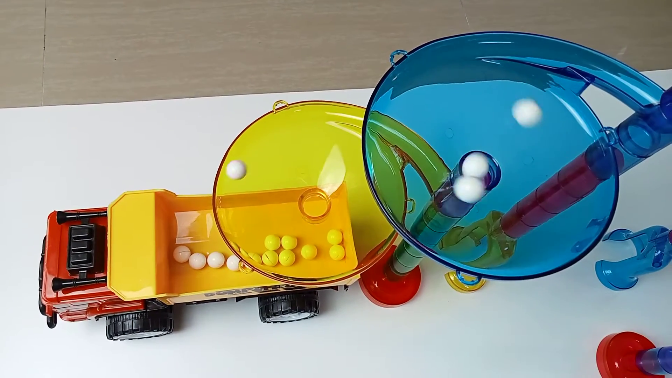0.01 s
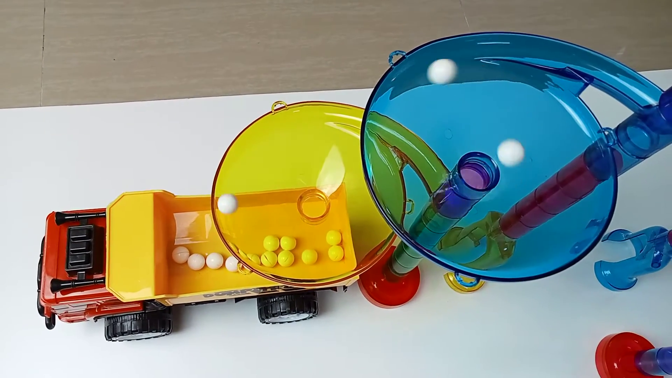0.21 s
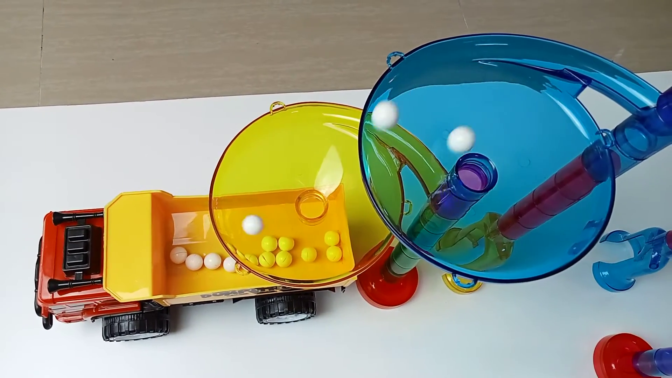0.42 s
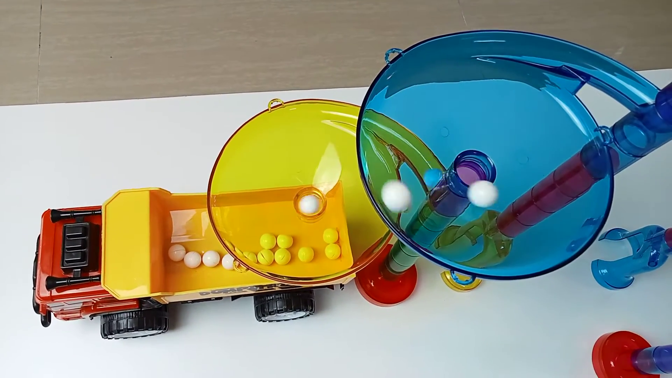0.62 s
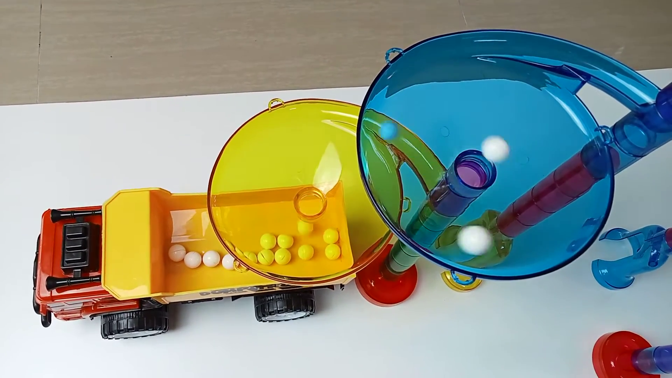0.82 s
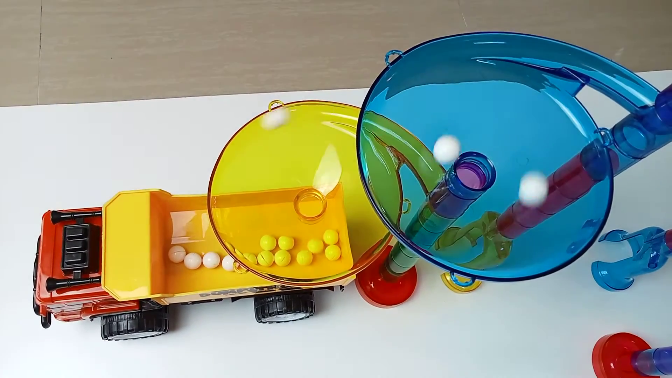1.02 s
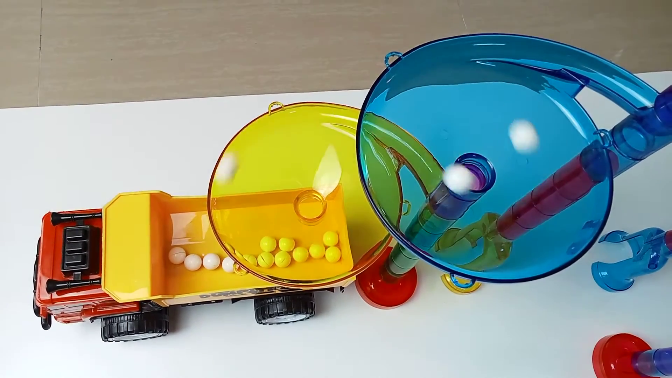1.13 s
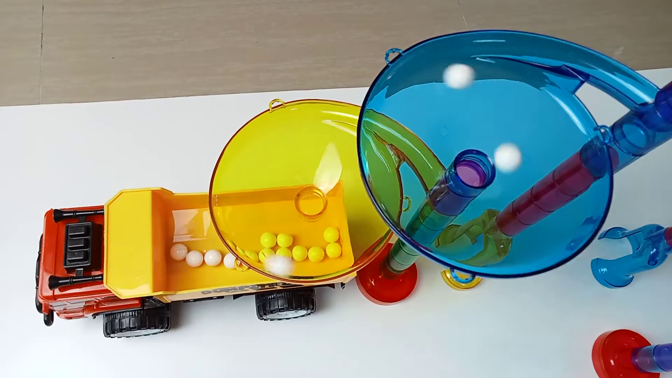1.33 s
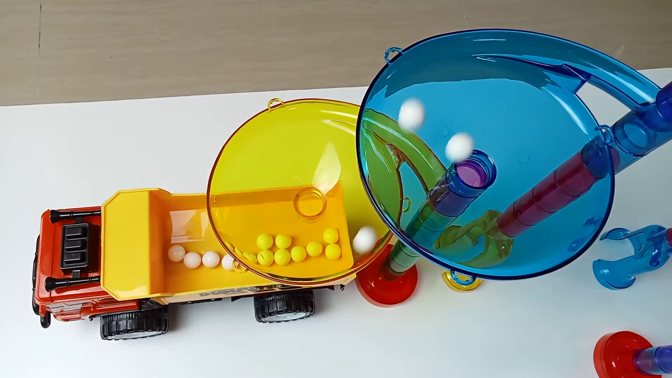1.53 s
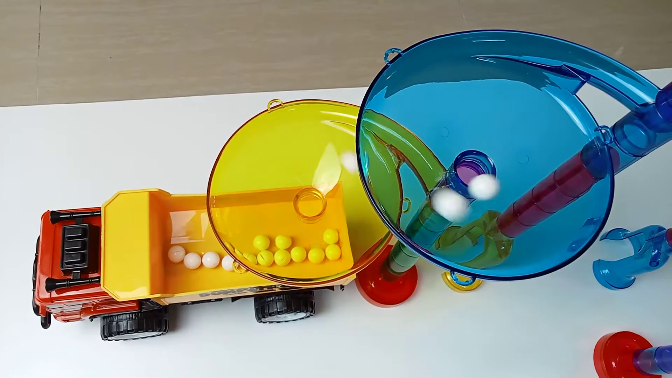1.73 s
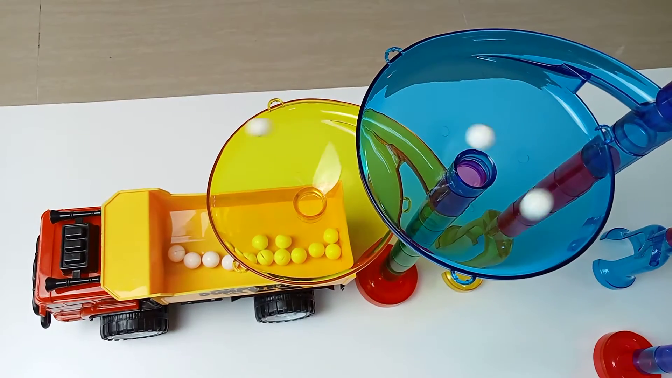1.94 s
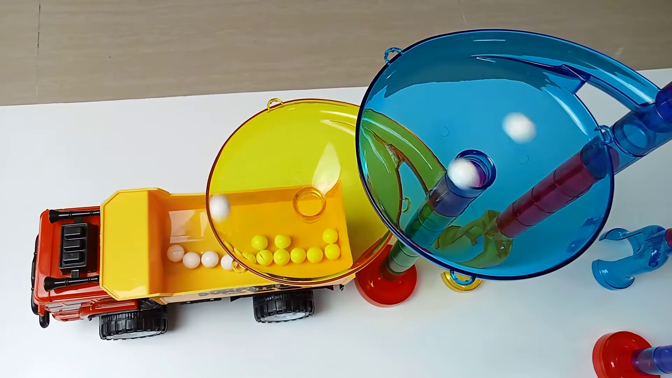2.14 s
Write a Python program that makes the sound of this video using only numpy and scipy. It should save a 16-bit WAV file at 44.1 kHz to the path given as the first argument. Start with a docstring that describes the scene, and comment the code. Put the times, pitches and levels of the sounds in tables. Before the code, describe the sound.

Plastic balls rattle and click around hollow funnels, drop with sharp clacks, then roll on quietly.

```python
"""Small balls rattle round the plastic funnels of a marble run in a bare room: cracks of dense modes and tuned rings.
One chatters in a funnel's throat, drops into a toy truck's bed and bounces; another knocks down a chute.
The rest roll on as resonant noise and tick over the plastic in tiny noise grains.
Low coloured noise is the room's background; noise responses give the reflections and tail."""
import sys
import numpy as np
from scipy import signal
from scipy.fft import rfft, irfft, next_fast_len
from scipy.io import wavfile
from scipy.ndimage import uniform_filter1d, minimum_filter1d, map_coordinates

SR = 44100
rng = np.random.default_rng(int(sys.argv[2]) if len(sys.argv) > 2 else 0)


def waveform_to_disk(signal):
    """Save audio, clipped to [-1, 1], as 16-bit WAV at the path in sys.argv[1]."""
    frames = np.transpose(np.atleast_2d(signal))
    scaled = np.clip(frames, -1, 1) * 32767
    samples = np.round(scaled).astype(np.int16)
    wavfile.write(sys.argv[1], SR, samples)


N = 97020
TIME_S = np.arange(N) / SR
HIT_T = np.arange(4096) / SR  # time within one contact (s)
BUILD_S = 0.0006  # time constant of a contact's onset
HIT_DB = -23.5  # level common to all contacts

# ringing of the funnel: pitch_hz [Hz], level_db [dB, relative], t60_s [s]
FUNNEL_MODES = [(647.6, -5.5, 0.061), (805, -5, 0.041), (1385, 2.5, 0.076), (1548, -0.5, 0.043),
                (1927, -6, 0.28), (2190, -1, 0.13), (2530, 7, 0.024), (2512, -6, 0.15), (2830, -10, 0.077),
                (3340, 13, 0.0043), (3726, 14.5, 0.0063), (3932, 1.5, 0.041)]
# colour of the funnel's many short-lived modes: freq_hz [Hz], level_db [dB, relative]
FUNNEL_COLOUR = [(100, -38), (250, -32), (500, -23.5), (650, -8), (1150, -5.5), (1400, 1), (2400, 3),
                 (4000, -2), (4500, -10), (5900, -22), (7200, -7), (8500, -20.5), (10500, -31),
                 (13000, -26), (15500, -29.5)]


def funnel_rattle():
    """Balls strike the funnel wall and bump on its slope; every wall hit carries its share of a very high ping."""
    # ball against funnel wall: start_s [s], level_db [dB, relative], bright_db [dB per octave], ping_db [dB]
    wall_hits = [(.048, -31, -4.5, -9), (0.109, -19, -2, -23), (.193, -15.5, -5, -14),
                 (0.213, -13.5, 3, -1), (.228, -19, -6, -2), (.269, -16, 2, -11), (.282, -11, 7.5, -10),
                 (0.292, -10, 2.5, -2), (0.302, -13, 5, -6), (0.332, -23, -3, -8), (0.55, -0.5, 4, 4),
                 (.567, -20.5, 2, -10), (.576, -20.5, 10, -14), (.617, -4, 2.5, -7), (0.6701, -8, 4.5, -12),
                 (.705, -8, 6, 7), (1.2661, -20.5, -0.5, -10), (1.305, -32, 2, -17), (1.360, -31, 2.5, -4),
                 (1.597, -23.5, -6, -13), (1.628, -36, 4.5, 0), (1.907, -37, 0, -6.5),
                 (1.9769, -22, -3, -9), (2.0653, -19, 1.5, -6.5), (2.119, -23.5, 1, -15)]
    # the whole bowl flexing: pitch_hz [Hz], level_db [dB, relative], t60_s [s]
    bowl_modes = [(265, -20, 0.043), (366, -13, 0.02)]
    # soft bumps of a rolling ball on the slope: start_s [s], level_db [dB, relative]
    slope_bumps = [(1.165, -20.5), (1.1762, -16.5), (1.596, -40), (1.761, -19), (2.06, -17.5), (2.064, -15),
                   (2.12, -23), (2.134, -20.5)]
    # ringing of the slope: pitch_hz [Hz], level_db [dB, relative], t60_s [s]
    slope_modes = [(1389, 9, 0.047), (1530, 2.5, 0.016), (1640, -5, 0.079)]
    ping_hz, ping_t60_s, ping_base_db = 12690, 0.016, -16.5

    hits, pings = np.zeros(N), np.zeros(N)
    for start_s, level_db, bright_db, ping_db in wall_hits:
        hit = clack(FUNNEL_MODES + bowl_modes, FUNNEL_COLOUR, bright_db, crack_t60=0.036, ring_db=-2)
        add(hits, start_s, amp(level_db) * hit)
        phase_drift = np.cumsum(rng.normal(0, 0.035, len(HIT_T)))  # radians; blurs the ping's pitch
        ping = fade(ping_t60_s) * np.sin(2 * np.pi * ping_hz * HIT_T + phase_drift)
        add(pings, start_s, amp(level_db + ping_base_db + ping_db) * unit(ping))
    for start_s, level_db in slope_bumps:
        add(hits, start_s, amp(level_db) * ringing(slope_modes))
    return in_room(hits, wet_db=-8.0, early_db=-16) + in_room(pings, wet_db=-25, early_db=-17)


def throat_chatter():
    """A ball bounces from side to side in the funnel's throat: hard clicks over the throat's ring."""
    # ball against the throat: start_s [s], click_db [dB, relative], bright_db [dB per octave], ring_db [dB, relative]
    clicks = [(.357, 3, 2.5, -13), (.3695, -4.5, 4.5, -7.5), (.375, -2.5, -0.5, -16),
              (.389, -11, -5, -15.5), (.402, -10.5, 1, -30), (.414, -6.5, 1, -17), (.429, -8, -1, -13.5),
              (.436, -13, 0, -30), (0.4445, -4, 3, -42), (.458, -11, -4, -13), (0.4825, -6, 0.5, -18.5),
              (.497, -18.5, 3, -26), (.5105, -7.5, 0, -14), (.527, -17.5, 4, -20)]
    # the throat's hard rim: pitch_hz [Hz], level_db [dB, relative], t60_s [s]
    rim_modes = [(3820, 20, 0.018)]
    # ringing of the throat: pitch_hz [Hz], level_db [dB, relative], t60_s [s]
    throat_modes = [(676, -24, 0.16), (1362, 1.5, 0.058), (1416, -7, 0.073)]

    out = np.zeros(N)
    for start_s, click_db, bright_db, ring_db in clicks:
        click = clack(FUNNEL_MODES + rim_modes, FUNNEL_COLOUR, bright_db, crack_t60=0.028, ring_db=2.5)
        add(out, start_s, amp(click_db) * click)
        add(out, start_s, amp(ring_db) * ringing(throat_modes))
    return in_room(out, wet_db=-11.5, early_db=-13)


def truck_bed():
    """The falling ball cracks on the bed's floor and bounces; the hollow under it thuds, less deeply each time."""
    # ball on the bed: start_s [s], crack_db [dB, relative], thud_db [dB, relative], lowest pitch of the thud [Hz]
    landings = [(0.8909, -3.5, -4.5, 396), (.8935, 5, -3, 400), (.909, -15, -18.5, 436),
                (0.9746, -10, -5, 506), (1.001, -28, -13.5, 694), (1.1914, -44, -16, 790)]
    # ringing of the floor: pitch_hz [Hz], level_db [dB, relative], t60_s [s]
    bed_modes = [(2632, 3.3, 0.015), (2800, 2.1, 0.013)]
    # colour of the floor's crack: freq_hz [Hz], level_db [dB, relative]
    bed_colour = [(300, -33.5), (500, -30), (950, -7.5), (1500, 3), (2100, -4), (2750, 9.5), (3500, 1),
                  (4400, -13), (5500, -25.5), (7300, -7.5), (10000, -27), (15500, -33)]
    # ringing of the hollow: pitch_hz [Hz], level_db [dB, relative], t60_s [s]
    hollow_modes = [(464, -6, 0.021), (625, -3.5, 0.024), (905, 3.5, 0.036), (977, -4.5, 0.083),
                    (1064, -2.5, 0.074)]
    # colour of the hollow's thud: freq_hz [Hz], level_db [dB, relative]
    hollow_colour = [(280, -29.5), (430, -4.5), (700, -2), (950, 9.5), (1200, -6), (1700, -12.5),
                     (4000, -46)]
    bed_ring_db = -4.5  # the floor's own ring against the crack

    cracks, rings, thuds = np.zeros((3, N))
    for start_s, crack_db, thud_db, lowest_hz in landings:
        crack = clack(bed_modes, bed_colour, 0, crack_t60=0.024, ring_db=-10)
        add(cracks, start_s, amp(crack_db) * crack)
        add(rings, start_s, amp(crack_db + bed_ring_db) * ringing(bed_modes))
        thud = clack(hollow_modes, hollow_colour, 0, crack_t60=0.043, ring_db=-1)
        add(thuds, start_s, amp(thud_db) * above(thud, lowest_hz))
    # the floor's rings stay dry
    return rings + in_room(cracks, wet_db=-5.5, early_db=-35) + in_room(thuds, wet_db=-12.5, early_db=-15)


def chute_knocks():
    """A ball knocks its way down the chute, each knock a crack over the chute's modes."""
    # ball against the chute: start_s [s], level_db [dB, relative], bright_db [dB per octave]
    knocks = [(0.763, -6, -1.5), (0.771, -10.5, 7), (.781, -15, -1.5), (0.7965, -6, 2.5)]
    # ringing of the chute: pitch_hz [Hz], level_db [dB, relative], t60_s [s]
    chute_modes = [(1183, 0.5, 0.048), (1470, -5, 0.058), (2050, 1, 0.079), (2162, -0.5, 0.11),
                   (2550, -7, 0.031), (7170, -2, 0.014)]
    # colour of its many short-lived modes: freq_hz [Hz], level_db [dB, relative]
    chute_colour = [(200, -31.5), (900, -13), (1200, -2), (1600, -8), (2200, 2), (3800, -9), (4700, -20),
                    (6000, -25), (7200, -20), (9000, -29.5), (15500, -42)]

    out = np.zeros(N)
    for start_s, level_db, bright_db in knocks:
        knock = clack(chute_modes, chute_colour, bright_db, crack_t60=0.055, ring_db=-4.0)
        add(out, start_s, amp(level_db) * knock)
    return in_room(out, wet_db=-17.0, early_db=-5.5)


def rolling():
    """Tiny bumps under circling balls sound the funnels, in resonances that shift with the balls' places."""
    # rolling level: time_s [s], level_db [dB]
    roll_level = [(0, -39), (0.201, -37), (.35, -40.5), (.7, -35), (.88, -49), (1.15, -39.5), (1.45, -40),
                  (1.6, -38.5), (1.85, -37.5), (2.2, -38)]
    # colour of the tiny bumps: freq_hz [Hz], level_db [dB, relative]
    roll_colour = [(200, -22.5), (400, -21), (680, -4), (850, -9), (1130, 4), (1600, -2), (1800, -10),
                   (2150, -5.5), (3600, -13.5), (4500, -27.5), (5700, -42.5), (7200, -22), (9500, -55.5)]
    # shifting resonances: centre_hz [Hz], swing_hz [Hz], width_hz [Hz], level_db [dB, relative]
    resonances = [(1528, 65, 140, -0.5), (2223, 250, 146, -7)]
    bumps_per_s, wander_per_s = 3000, 9  # wander: random knots of the resonances' shift

    roughness = amp(2.13 * wobble(40.32))
    bumps = rng.standard_normal(N) * (rng.random(N) < bumps_per_s / SR)
    sound = shaped(bumps * roughness, roll_colour)
    for centre_hz, swing_hz, width_hz, level_db in resonances:
        drive = rng.standard_normal(N) + 1j * rng.standard_normal(N)
        # low-passed complex noise, turned at the moving pitch, becomes a moving band
        lowpass = signal.butter(2, width_hz / 2, fs=SR, output="sos")
        swell = signal.sosfilt(lowpass, drive * roughness)
        turns = np.cumsum(centre_hz + swing_hz * np.sin(wobble(wander_per_s))) / SR
        band = np.real(swell * np.exp(2j * np.pi * turns))
        sound = sound + amp(level_db) * unit(band)
    return level_curve(roll_level) * unit(in_room(sound, wet_db=-8, early_db=-6))


def fine_rattle():
    """Seams and dents make the balls hop slightly: many tiny contacts, each a fading grain of noise."""
    # level of the fine rattle: time_s [s], level_db [dB]
    grain_level = [(0, -44), (0.298, -41.5), (.7, -40), (.88, -37.5), (1.3, -49), (1.53, -63), (1.61, -45),
                   (1.72, -46.5), (1.81, -51.5), (1.89, -43), (2.03, -45.5), (2.2, -45)]
    # colour of the grains: freq_hz [Hz], level_db [dB, relative]
    grain_colour = [(300, -47), (620, -14.5), (850, -17.5), (1150, -0.5), (1700, 10.5), (2150, 1),
                    (3200, 6.5), (4000, -5.5), (4700, -21), (6000, -22), (7200, -11.5), (9500, -23.5),
                    (13000, -34), (15500, -51)]
    grains_per_s, grain_t60_s, scatter_db = 110, 0.023, 3

    strengths = amp(scatter_db * np.clip(rng.standard_normal(N), -2, 2))
    contacts = (rng.random(N) < grains_per_s / SR) * strengths
    energy = signal.fftconvolve(contacts ** 2, fade(grain_t60_s) ** 2)[:N]
    grains = np.sqrt(np.abs(energy)) * rng.standard_normal(N)
    return level_curve(grain_level) * shaped(grains, grain_colour)


def room_background():
    """Steady low noise in a fixed colour, its level drifting slowly."""
    # level of the low background: time_s [s], level_db [dB]
    rumble_level = [(0, -55.5), (.75, -54.5), (1.0, -60), (1.3, -61.5), (1.6, -54.5), (2.2, -55)]
    # its colour: freq_hz [Hz], level_db [dB, relative]
    rumble_colour = [(20, -35), (48, -29), (62, -6), (80, -10.5), (105, 0.5), (140, -4), (200, -13.5),
                     (243, -2.5), (320, -15.5), (470, -6), (900, -41.5)]
    return level_curve(rumble_level) * shaped(rng.standard_normal(N), rumble_colour)


def clack(modes, colour, bright_db, crack_t60, ring_db):
    """One contact: a snap, a crack of dense modes and the part's main modes; brightness tilts them all."""
    snap_db, snap_t60_s = -7, 0.006  # first instant of the contact, over its crack

    def tilt(hz):
        return bright_db * np.log2(np.clip(hz, 1300, 9000) / 2000)

    envelope = fade(crack_t60) + amp(snap_db) * fade(snap_t60_s)
    onset = 1 - np.exp(-HIT_T / BUILD_S) / 2  # starts at half height
    burst = rng.choice([-1, 1], len(HIT_T)) * envelope * onset
    crack = unit(coloured(burst, lambda hz: along(colour, hz) + tilt(hz)))
    return unit(crack + amp(ring_db) * ringing(modes, tilt))


def ringing(modes, tilt=lambda hz: 0):
    """Decaying sines for the modes of a struck part, a little different at every spot."""
    scatter_db, detune = 2.5, 0.008  # spread of level (dB) and of pitch (share of the pitch)
    ring = np.zeros(len(HIT_T))
    for pitch_hz, level_db, t60_s in modes:
        gain = amp(level_db + tilt(pitch_hz) + scatter_db * rng.normal())
        struck_hz = pitch_hz * (1 + detune * rng.normal())
        ring += gain * fade(t60_s) * np.sin(2 * np.pi * (struck_hz * HIT_T + rng.random()))
    return unit(ring * (1 - np.exp(-HIT_T / BUILD_S)))


def fade(t60):
    """Exponential decay over the length of one contact, down 60 dB after t60 seconds."""
    return np.exp(-np.log(1000) * HIT_T / t60)


def add(track, start_s, sound):
    """Lay a sound on the track at start_s, cut at the track's end."""
    part = track[max(round(start_s * SR), 0):][:len(sound)]
    part += sound[:len(part)]


def in_room(x, wet_db, early_db):
    """The sound, its first reflections from table and toys, and the room's tail, both of fading noise."""
    # decay of the room: freq_hz [Hz], t60_s [s]
    room_t60 = [(200, 0.73), (1000, 0.9), (2800, 0.71), (7000, 0.59), (14000, 0.28)]
    # colour of the tail: freq_hz [Hz], level_db [dB, relative]
    room_colour = [(200, -3), (650, -1), (1400, -3), (3000, -4), (7000, -1), (14000, 2)]

    hz, frame_s, bins = signal.stft(rng.standard_normal(SR), SR, nperseg=256)
    tail_db = along(room_colour, hz)[:, None] - 60 * frame_s / along(room_t60, hz)[:, None]
    tail = signal.istft(bins * amp(tail_db), SR, nperseg=256)[1][:SR]
    t = np.arange(SR) / SR
    tail *= 1 - np.exp(-t / 0.016)  # the tail builds up gradually
    early = rng.standard_normal(SR) * amp(-60 * t / 0.11) * (t > 0.004)
    answer = amp(wet_db) * tail / np.linalg.norm(tail)
    answer += amp(early_db) * early / np.linalg.norm(early)
    answer[0] += 1  # direct sound
    return signal.fftconvolve(x, answer)[:N]


def amp(db):
    """Decibels to gain."""
    return 10 ** (np.asarray(db) / 20)


def unit(x):
    """Scale to rms 1."""
    return x / np.sqrt(np.mean(x ** 2) + 1e-20)


def level_curve(points):
    """Gain over the whole scene from (s, dB) points, straight in dB between them."""
    return amp(np.interp(TIME_S, *np.transpose(points)))


def along(points, hz):
    """(Hz, value) points read on a log frequency axis."""
    f, v = np.transpose(points)
    return np.interp(np.log(hz + 1), np.log(f + 1), v)


def coloured(x, level):
    """Causal minimum-phase filter whose gain in dB is level(Hz)."""
    m = next_fast_len(len(x), True)
    # fold the cepstrum of the log gain onto positive times
    cepstrum = irfft(np.log(10) / 20 * level(np.fft.rfftfreq(m, 1 / SR)), m)
    cepstrum[1:m // 2] *= 2
    cepstrum[m // 2 + 1:] = 0
    return irfft(rfft(x, m) * np.exp(rfft(cepstrum)), m)[:len(x)]


def shaped(x, points):
    """x in the given colour, at rms 1."""
    return unit(coloured(x, lambda hz: along(points, hz)))


def wobble(rate):
    """A smooth random curve, rate knots a second."""
    knots = rng.standard_normal(int(N * rate / SR) + 4)
    return map_coordinates(knots, [np.arange(N) * rate / SR])


def above(x, edge_hz):
    """Steep fifth-order high-pass."""
    return signal.sosfilt(signal.butter(N=5, Wn=edge_hz, btype="high", fs=SR, output="sos"), x)


def scene():
    """The marble run over the room's low background, in one channel."""
    contacts = funnel_rattle() + throat_chatter() + truck_bed() + chute_knocks()
    return (amp(HIT_DB) * contacts + rolling() + fine_rattle() + room_background())[None]


def record(dry):
    """The limiter holds the highest peaks down; a sharp band limit then removes everything above it."""
    ceiling, top_hz = 0.95, 15800  # ceiling: peak height ahead of the band limit
    needed = ceiling / np.maximum(np.abs(dry), ceiling)
    gain = uniform_filter1d(minimum_filter1d(needed, size=301), size=201)  # windows in samples
    m = next_fast_len(N + SR // 2)
    kept = np.fft.rfftfreq(m, 1 / SR) < top_hz
    return irfft(rfft(dry * gain, m) * kept, m)[..., :N]


dry = scene()
out = record(dry)
waveform_to_disk(out)
```